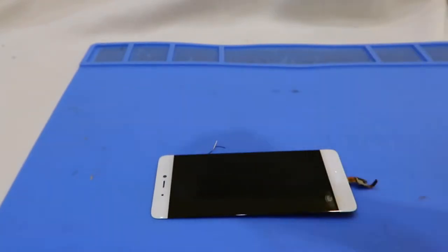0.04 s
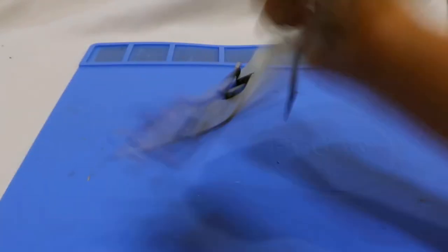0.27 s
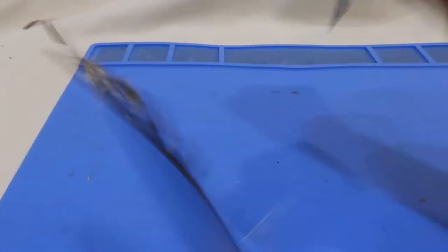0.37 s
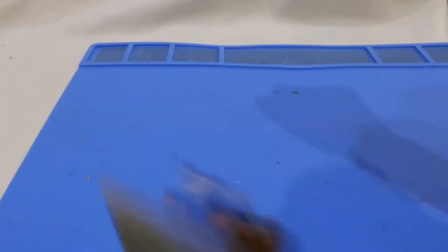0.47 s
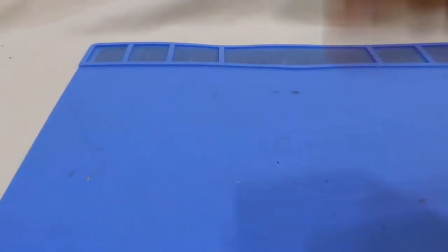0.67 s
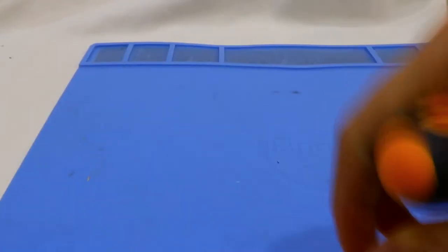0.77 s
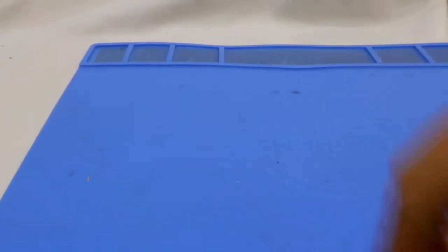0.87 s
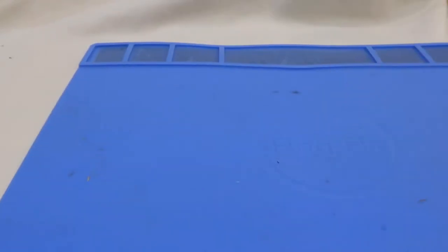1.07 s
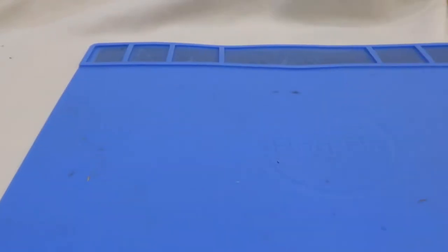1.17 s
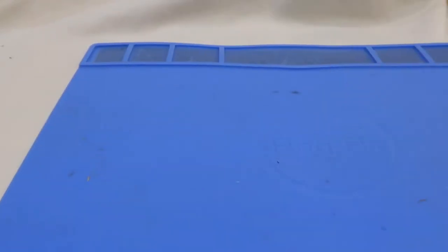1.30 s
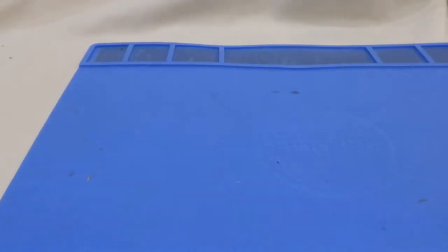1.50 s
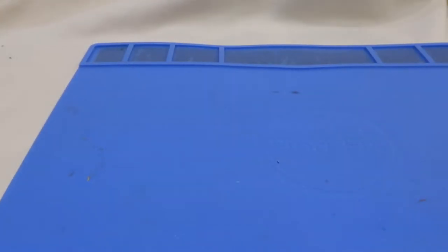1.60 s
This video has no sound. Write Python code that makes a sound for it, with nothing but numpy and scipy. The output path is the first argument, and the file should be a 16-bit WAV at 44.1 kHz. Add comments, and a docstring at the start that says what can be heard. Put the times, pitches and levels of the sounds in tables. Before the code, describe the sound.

A sharp, loud crack of a tool hitting a phone screen, then a brief rattle.

```python
"""A work table in a small room. A hard tool cracks a loose phone screen: fracture noise and glass modes
overload the microphone, and the table top thuds. The screen flies off; small bits tick and skitter,
something knocks once, and the screen lands beyond the table edge and rattles to rest.
The room rings briefly after the hits, over soft bumps and a faint rumble."""
import sys
import numpy as np
from scipy import signal
from scipy.fft import rfft, irfft
from scipy.io import wavfile

SR = 44100
rng = np.random.default_rng(int(sys.argv[2]) if len(sys.argv) > 2 else 0)


def store_wav(level_fs):
    """Save 16-bit WAV to argv[1]."""
    pcm = np.round(np.clip(np.atleast_2d(level_fs), -1, 1) * 32767)
    wavfile.write(sys.argv[1], SR, pcm.T.astype(np.int16))


N = 72765
T = np.arange(N) / SR
HZ = np.fft.rfftfreq(2 * N, 1 / SR)
BLOW_S = 0.201


def amp(db):
    """Decibels to gain."""
    return 10 ** (np.asarray(db) / 20)


def along(points, hz):
    """Interpolate (freq_hz, value) points on a log-frequency axis."""
    p = np.array(points, float)
    return np.interp(np.log(hz + 1), np.log(p[:, 0]), p[:, 1])


def octaves(hz, centre_hz):
    """Octaves from a centre, constant below 100 Hz."""
    return np.log2(np.maximum(hz, 100) / centre_hz)


def colour(x, curve_db, size=4096):
    """Minimum-phase filter with gain curve_db(hz)."""
    cepstrum = irfft(np.log(amp(curve_db(np.fft.rfftfreq(size, 1 / SR)))))
    cepstrum[1:size // 2] *= 2
    cepstrum[size // 2 + 1:] = 0
    return signal.fftconvolve(x, irfft(np.exp(rfft(cepstrum))))[:len(x)]


def fade(t, t60_s):
    """Fall of 60 dB in t60_s."""
    return np.exp(-np.log(1000) * t / t60_s)


def unit(x):
    """Scale to the energy of 5 ms at full level."""
    return x * np.sqrt(.005 * SR / np.sum(x ** 2))


def add(out, x, start_s):
    """Mix x in at start_s."""
    i = int(start_s * SR)
    out[i:i + len(x)] += x[:N - i]


def burst(curve_db, t60_s, attack_s, size=16384):
    """Contact crunch: short coloured noise."""
    t = T[:size]
    rise = np.minimum((t + 1 / SR) / (attack_s + 1 / SR), 1)
    envelope = rise * fade(np.maximum(t - attack_s, 0), t60_s)
    return unit(colour(rng.standard_normal(size) * envelope, curve_db))


def ring(modes, tilt_db_oct=0, spread_db=0, detune=0.0044, size=16384):
    """Decaying modes; each contact point weights and tunes them differently."""
    t, body = T[:size], np.zeros(size)
    for (hz, db, t60_s), (gain_draw, pitch_draw) in zip(modes, rng.standard_normal((len(modes), 2))):
        gain = amp(db + tilt_db_oct * octaves(hz, 1000) + spread_db * gain_draw)
        polarity = np.sign(rng.standard_normal()) if spread_db else 1
        pitch_hz = hz * (1 + detune * pitch_draw)
        body += polarity * gain * np.sin(2 * np.pi * pitch_hz * t) * fade(t, t60_s)
    return unit(body)


def hit(noise, modes, t60_s, tilt_db_oct, ring_db, spread_db, attack_s=0.0012, tilt_top_hz=3530):
    """Contact noise plus body modes, tilted brighter or duller for each contact."""
    curve_db = lambda hz: along(noise, hz) + tilt_db_oct * octaves(np.minimum(hz, tilt_top_hz), 1000)
    crunch = burst(curve_db, t60_s, attack_s)
    body = ring(modes, tilt_db_oct, spread_db)
    return crunch + amp(ring_db) * body * np.minimum(T[:len(body)] / attack_s, 1)


def diffuse(spectrum, unrelated_hz=5000):
    """Stereo noise of rms 1, alike in the bass, unrelated in the treble."""
    mid, side = rfft(rng.standard_normal((2, 2 * N)))
    side = side * np.minimum(0.12 + HZ / unrelated_hz, 1)
    x = irfft(np.array([mid + side, mid - side]) * amp(along(spectrum, HZ)))[:, :N]
    return x / x.std()


def background(floor_db=-58, wash_db=-49.5, hold_s=0.26):
    """Steady rumble and hiss, plus a dull wash of room noise that dies away early."""
    # noise spectra: freq_hz, level_db
    floor = [(20, -4.5), (70, -2.5), (150, -12.5), (300, -18.5), (650, -26.5), (1300, -26), (3000, -31.5),
             (8000, -39), (15000, -45.5)]
    wash = [(30, -3.5), (150, 4.5), (400, -3), (800, -12), (1300, -6.5), (2200, -19), (6000, -27),
            (15000, -40)]
    wash_envelope = fade(np.maximum(T - hold_s, 0), t60_s=.7)
    return amp(floor_db) * diffuse(floor) + amp(wash_db) * diffuse(wash) * wash_envelope


def room_tail(x, delay_s=.007, build_s=0.0042, size=256):
    """Small-room reverb of x: builds up, then dies at its own rate in each band."""
    # room decay: freq_hz, t60_s
    decay = [(60, 0.25), (300, 0.45), (700, 0.4036), (1500, 0.31), (3500, 0.34), (8000, 0.1955),
             (15000, 0.2841)]
    # tail spectrum: freq_hz, level_db
    spectrum = [(60, -5.5), (400, -2.5), (900, -6.5), (1500, -6), (3200, -2), (8000, 1.5), (15000, 0.5)]
    hz, t, bands = signal.stft(diffuse(spectrum)[:, :N // 2], SR, nperseg=size)
    tail = signal.istft(bands * fade(t, along(decay, hz)[:, None]), SR, nperseg=size)[1]
    tail *= np.clip((T[:tail.shape[1]] - delay_s) / build_s, 0, 1)
    tail /= np.sqrt(np.sum(tail ** 2) / 2)
    return signal.fftconvolve(x[None], tail, axes=1)[:, :N]


def near_scatter(x, level_db=-8, t60_s=0.015, size=2048):
    """Reflections of x off things near the microphone, different at each port."""
    # reflection spectrum: freq_hz, level_db
    spectrum = [(100, -13), (1500, -3), (4000, 0), (15000, 1)]
    response = diffuse(spectrum)[:, :size] * fade(T[:size], t60_s)
    response *= amp(level_db) / np.sqrt(np.sum(response ** 2) / 2)
    return signal.fftconvolve(x[None], response, axes=1)[:, :N]


def table_bumps():
    """Soft bumps as things move and land, one low mode each."""
    # bumps: start_s, level_db, pitch_hz, t60_s
    bumps = [(.163, -40, 57.3, 0.098), (0.513, -44, 64.5, 0.096), (.702, -45.5, 181.2, 0.19),
             (.89, -37.5, 105.2, 0.14), (0.904, -43, 167, 0.02), (.992, -38.5, 145.4, 0.051),
             (1.012, -39, 76, 0.17), (1.074, -39, 190, 0.083), (1.078, -40.5, 82, 0.16),
             (1.204, -44, 110, 0.035), (1.38, -37, 104.5, 0.23), (1.429, -44, 139, 0.3)]
    out = np.zeros(N)
    for start_s, db, hz, t60_s in bumps:
        add(out, amp(db) * ring([(hz, 0, t60_s)]), start_s)
    return out


def small_bits():
    """Bits tick and slide, too briefly to ring."""
    # noise ticks: start_s, level_db, centre_hz, rolloff_db_oct, attack_s, t60_s
    ticks = [(.101, -47.5, 1300, 9, 0.00043, 0.02), (.517, -54.5, 8020, -0.5, 0.00012, 0.0092),
             (.5202, -49, 6990, 3.5, .0003, 0.0066), (.578, -42, 6500, 3.5, 0.0047, 0.043),
             (.689, -48, 6000, 1, .002, 0.021), (.698, -35.5, 1020, 8, .0003, 0.042),
             (.709, -41, 499, 8, .001, 0.026), (.7198, -43, 1300, 7, 0.00035, 0.027),
             (.867, -40.5, 7100, -0.5, .002, 0.048), (.882, -50.5, 10910, 2.5, .005, .07),
             (.97, -58, 10000, 3, .01, 0.12), (1.1975, -40.5, 633, 7, .004, 0.043),
             (1.198, -46.5, 2200, 11.5, .003, 0.074), (1.215, -50, 2810, 5, 0.0016, 0.024),
             (1.23, -47, 6000, -2.5, 0.0026, 0.056), (1.2465, -47, 2390, 9.5, 0.00069, 0.073),
             (1.259, -46, 8200, -0.5, 0.0036, 0.083), (1.47, -42, 9000, 3, 0.014, .12),
             (1.555, -50.5, 9000, 7, .012, .08)]
    out = np.zeros(N)
    for start_s, db, centre_hz, rolloff_db_oct, attack_s, t60_s in ticks:
        curve_db = lambda hz: -rolloff_db_oct * np.hypot(octaves(hz, centre_hz), .5)
        add(out, amp(db) * burst(curve_db, t60_s, attack_s), start_s)
    return out


def hollow_knock(start_s=1.0693, level_db=-34.5):
    """One knock, more ring than contact noise."""
    # hollow body: pitch_hz, level_db, t60_s
    modes = [(585, -8.5, 0.038), (1029, -7, 0.052), (1234, -5, 0.049), (1337, -5, 0.099), (1552, -12, .07),
             (1635, 0.5, 0.025), (1960, -18.5, 0.1), (2680, -27, 0.14), (3410, -14.5, 0.056)]
    # contact noise: freq_hz, level_db
    noise = [(100, -11), (700, -2), (1500, 1.5), (2500, -7), (5500, -8), (8000, -19), (15000, -25.5)]
    out = np.zeros(N)
    knock = hit(noise, modes, t60_s=0.052, tilt_db_oct=0, ring_db=6.5, spread_db=0.55)
    add(out, amp(level_db) * knock, start_s)
    return out


def screen_landing():
    """The screen comes down and rattles to rest."""
    # bounces: start_s, level_db, contact_t60_s, tilt_db_oct
    bounces = [(1.325, -39.5, 0.09, -1), (1.3413, -20.5, 0.025, -0.5), (1.3475, -32.5, 0.025, 3),
               (1.3558, -25, 0.032, 6), (1.3714, -21, 0.025, -2), (1.3745, -18.5, 0.024, -1),
               (1.3795, -19.5, 0.03, -.5), (1.391, -29, 0.042, -0.5), (1.401, -25, .03, 1.5),
               (1.409, -30, 0.046, 5), (1.4245, -30.5, 0.023, 6.5), (1.43, -29, 0.032, 5),
               (1.443, -30.5, 0.049, 13), (1.463, -44, 0.054, 2.5), (1.487, -45, 0.12, 15),
               (1.508, -42.5, 0.08, 5.5), (1.552, -52, 0.18, 9.5)]
    # screen and the surface under it: pitch_hz, level_db, t60_s
    modes = [(429, -6, 0.076), (544, -4, 0.017), (675, -13, .04), (972, -9.5, 0.052), (1068, 4.5, 0.047),
             (1265, -1.5, 0.035), (1596, -4, 0.084), (1866, -5, .06), (2040, -16, 0.14), (2260, -31, 0.042),
             (2715, -8.5, 0.042), (3480, -25, 0.065), (4083, -14.5, 0.024)]
    # contact noise: freq_hz, level_db
    noise = [(80, -16.5), (230, -11.5), (420, -2), (1100, 0.5), (2200, -7), (3300, -15.5), (4600, -20),
             (7000, -26), (11000, -30.5), (15000, -41.5)]
    out = np.zeros(N)
    for start_s, db, t60_s, tilt_db_oct in bounces:
        add(out, amp(db) * hit(noise, modes, t60_s, tilt_db_oct, ring_db=-1, spread_db=3.3), start_s)
    return out


def beyond_table(x, echo_s=0.016, echo_db=-12.5):
    """The table edge shades the direct treble; a close wall adds one echo."""
    # edge shadow: freq_hz, gain_db
    shade = [(100, -1.5), (500, -0.5), (2500, 0.5), (4500, -3), (7000, -6), (15000, -6)]
    out = colour(x, lambda hz: along(shade, hz))
    add(out, amp(echo_db) * x, echo_s)
    return out


def glass_snap(level_db=-13):
    """One sharp pressure pulse that the breaking glass sends up into the room."""
    # pulse spectrum: freq_hz, level_db
    spectrum = [(60, 0), (250, -1.5), (450, -7), (700, -8.5), (1200, -2), (1800, -3), (2400, -3),
                (3200, 1.5), (4500, -2), (6000, -4.5), (8000, -10), (12000, -15), (16000, -20.5)]
    out = np.zeros(N)
    pulse = colour(signal.unit_impulse(4096), lambda hz: along(spectrum, hz))
    add(out, amp(level_db) * unit(pulse), BLOW_S)
    return out


def tool_strike(thud_s=.2018, thud_db=-8.5, puff_s=.2045, puff_db=2.5, puff_width_s=.0006):
    """The tool cracks the screen, which slaps down, squeezes out air and rebounds; the table thuds."""
    # blow and rebounds: start_s, level_db, contact_t60_s, tilt_db_oct
    blows = [(0.201, 3, 0.011, -2), (.2066, -20.5, .01, -2), (0.2124, -13, 0.11, -1.5),
             (0.228, -17.5, 0.022, -1)]
    # fracture noise: freq_hz, level_db
    fracture = [(100, -2), (400, -3.5), (1000, 1.5), (1600, -8), (3100, 4.5), (5000, -0.5), (8000, -8),
                (12000, -12.5), (16000, -10)]
    # glass and frame: pitch_hz, level_db, t60_s
    screen_modes = [(509, 3, 0.033), (974, 1, 0.039), (1128, -0.5, .05), (2152, -10.5, 0.16),
                    (2250, -8.5, .06), (2570, -12, 0.05), (2780, -7.5, 0.035), (2945, -2.5, 0.05),
                    (3200, -12.5, 0.073), (3145, -0.5, 0.083), (3238, -1.5, 0.069), (3635, -4.5, .045),
                    (3890, -3.5, 0.074), (4250, -10, .08), (4760, -8.5, 0.099), (5400, -9, 0.019)]
    # table top: pitch_hz, level_db, t60_s
    table_modes = [(23.9, -10.5, 0.1), (57, -4, 0.16), (121, 1, 0.092), (165, -3.5, .08), (208, -1.5, 0.11),
                   (262, -2, 0.055), (291, -3, .12), (512.6, 0.5, 0.098)]
    out = np.zeros(N)
    for start_s, db, t60_s, tilt_db_oct in blows:
        crack = hit(fracture, screen_modes, t60_s, tilt_db_oct, ring_db=-7, spread_db=1.5,
                    attack_s=0.00043)
        add(out, amp(db) * crack, start_s)
    add(out, -amp(thud_db) * ring(table_modes), thud_s)
    air_puff = amp(puff_db) * np.exp(-.5 * ((T - puff_s) / puff_width_s) ** 2)
    return out - air_puff


def scene(left_lag_s=2.4e-5):
    """Direct sound at two close microphone ports, near reflections, room tail and background."""
    strike, bits = tool_strike(), small_bits()
    far = hollow_knock() + screen_landing()
    direct = strike + bits + beyond_table(far) + table_bumps()
    left = irfft(rfft(direct, 2 * N) * np.exp(-2j * np.pi * HZ * left_lag_s))[:N]
    room_send = glass_snap() + amp(-28) * strike + amp(-6.5) * bits + amp(-4.5) * far
    return np.array([left, direct]) + near_scatter(direct) + room_tail(room_send) + background()


def record(dry, bass_cut_hz=7, top_hz=16000):
    """The right port loses the deepest bass; the crack clips flat; the top is cut."""
    right = signal.sosfilt(signal.butter(1, bass_cut_hz, "high", fs=SR, output="sos"), dry[1])
    clipped = np.clip([dry[0], right], -1, 1)
    return signal.sosfilt(signal.ellip(8, .2, 70, top_hz, fs=SR, output="sos"), clipped)


dry = scene()
out = record(dry)
store_wav(out)
```